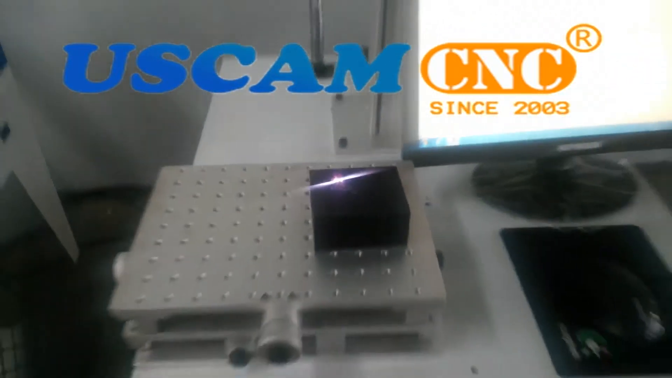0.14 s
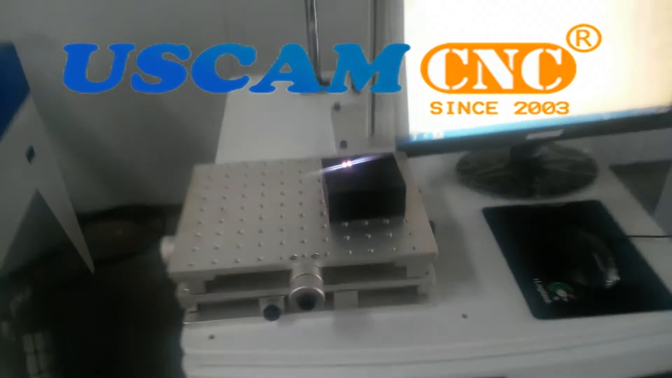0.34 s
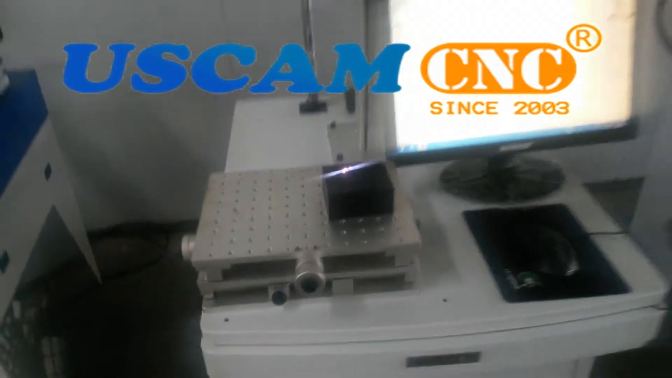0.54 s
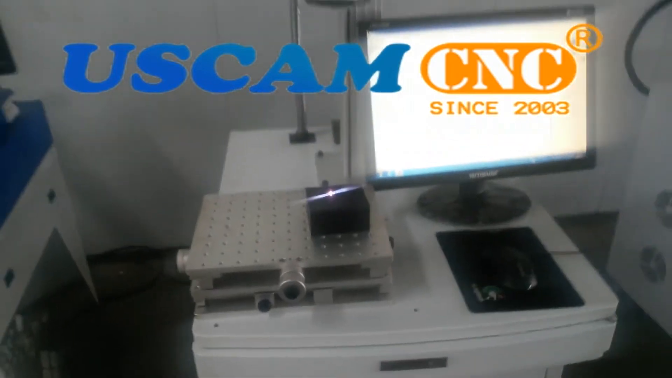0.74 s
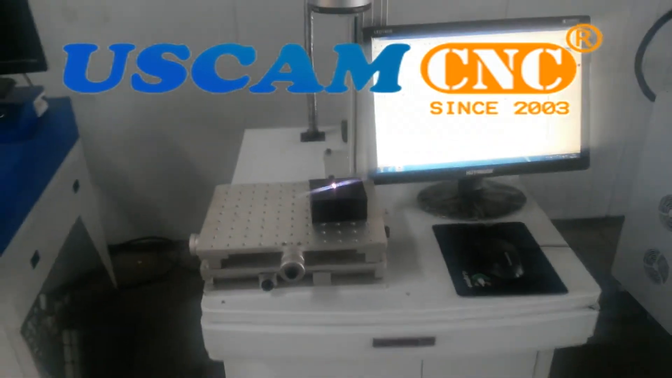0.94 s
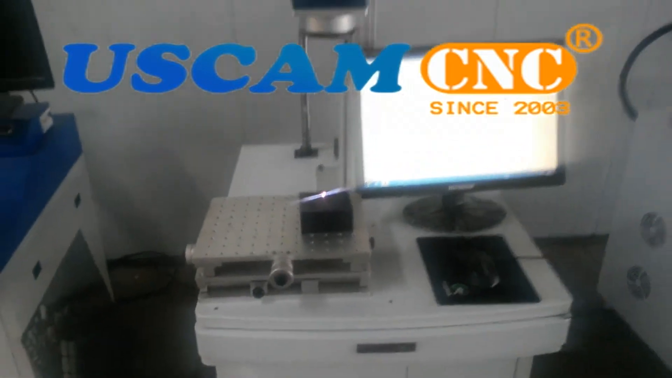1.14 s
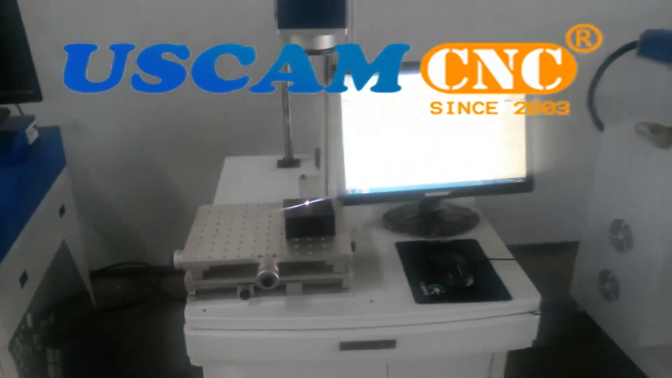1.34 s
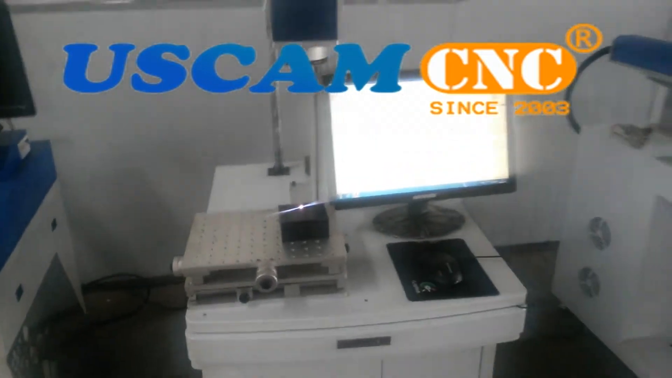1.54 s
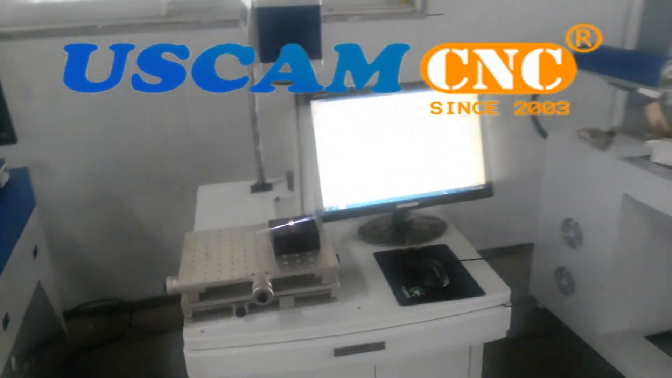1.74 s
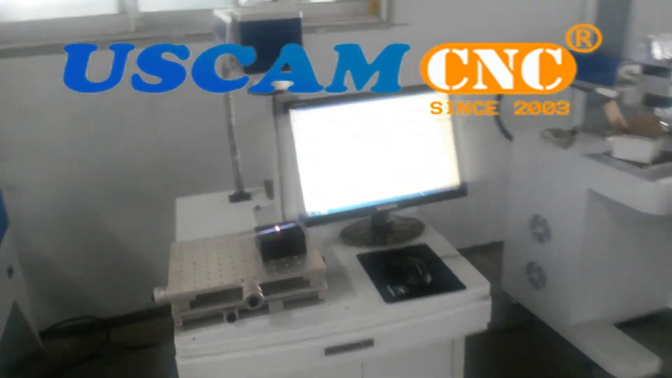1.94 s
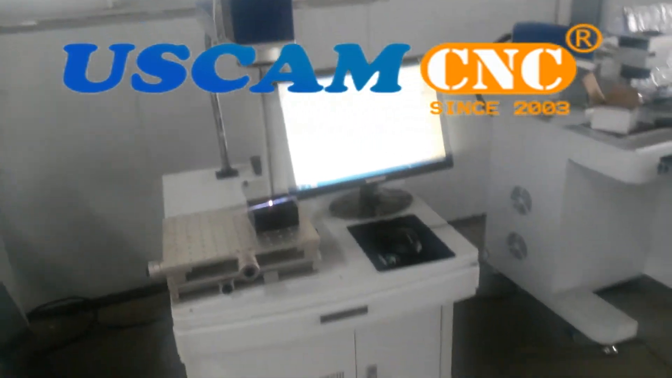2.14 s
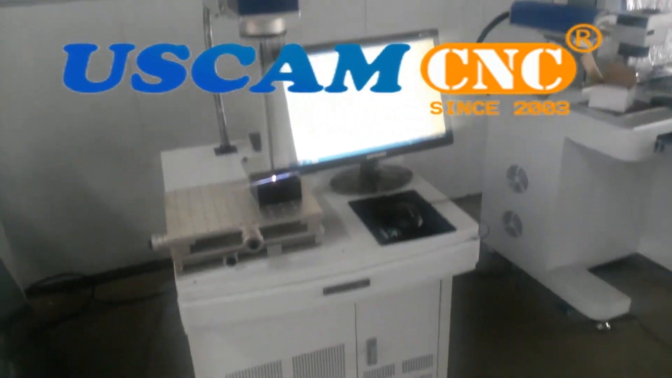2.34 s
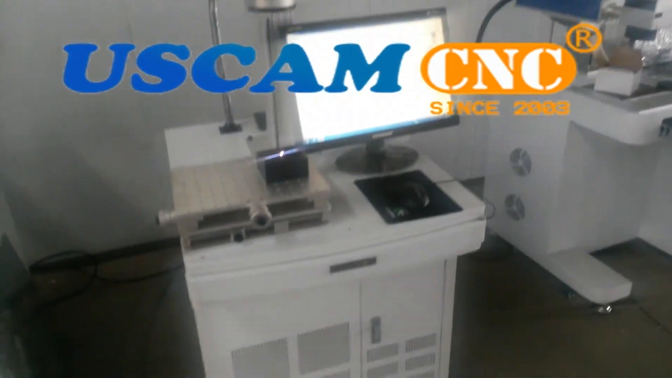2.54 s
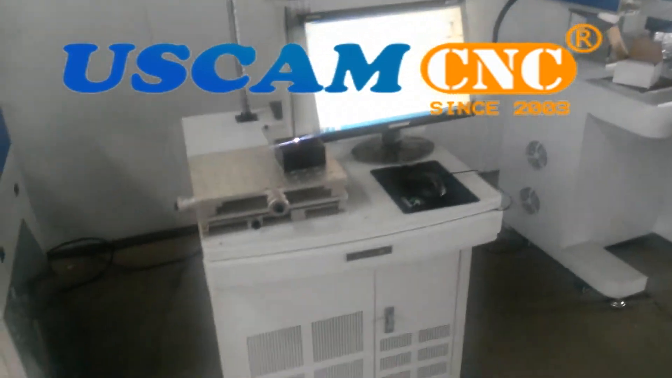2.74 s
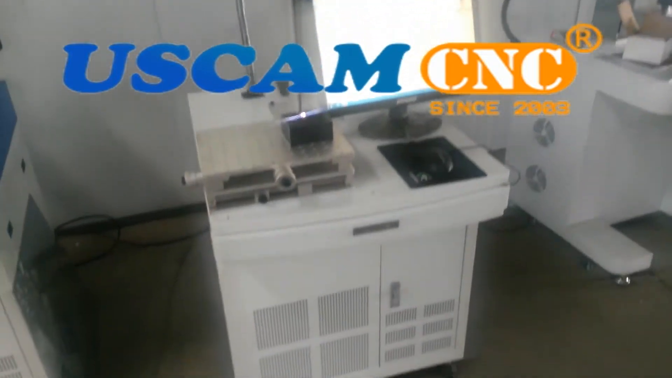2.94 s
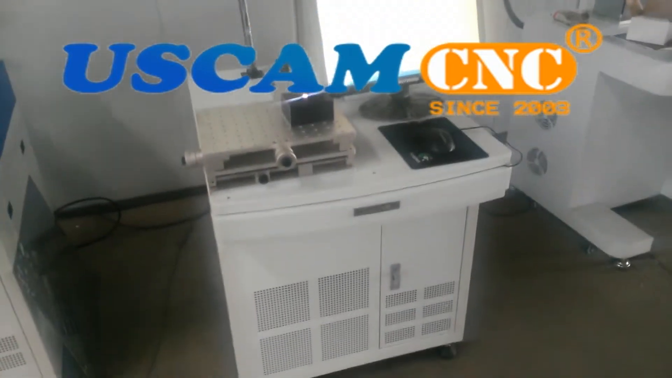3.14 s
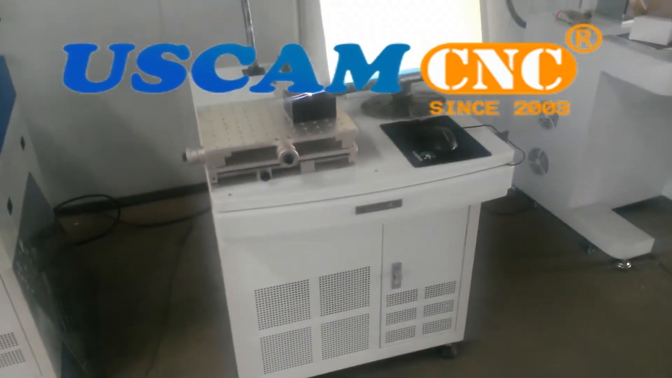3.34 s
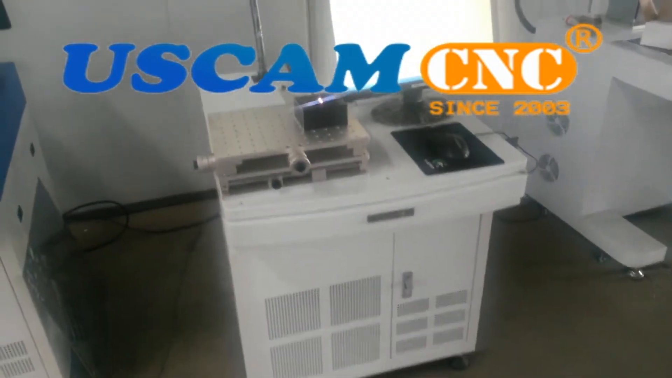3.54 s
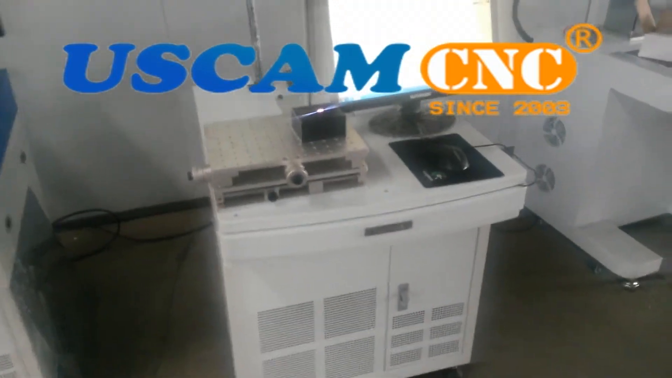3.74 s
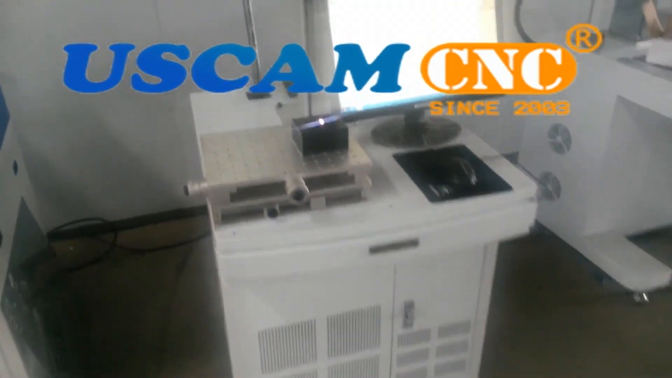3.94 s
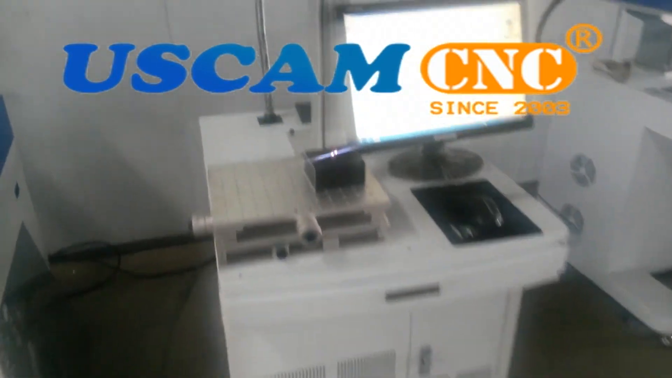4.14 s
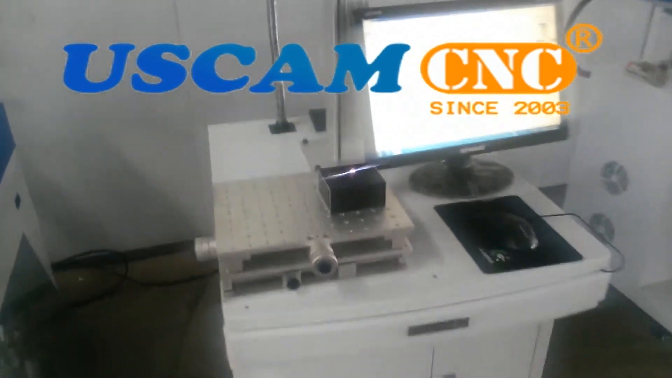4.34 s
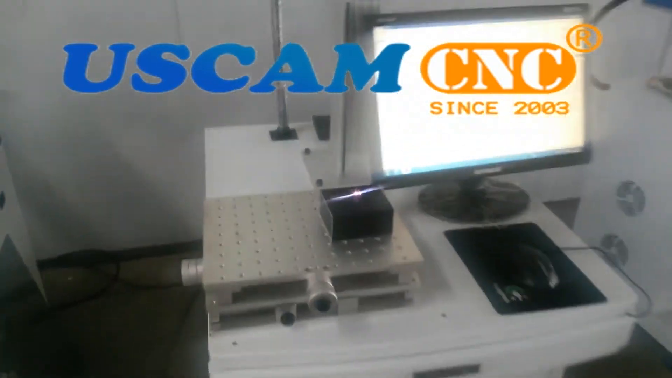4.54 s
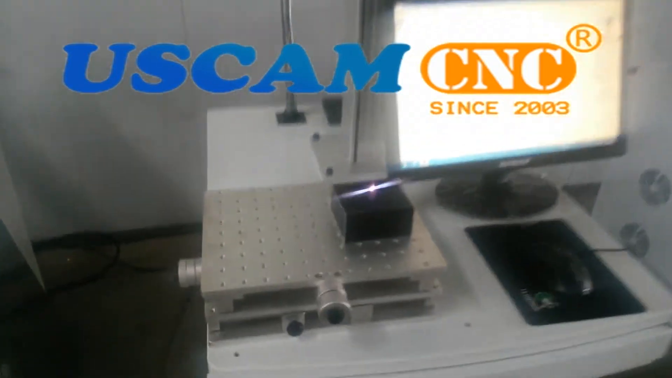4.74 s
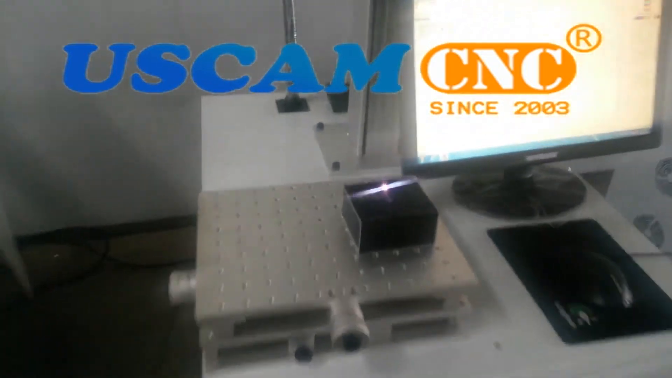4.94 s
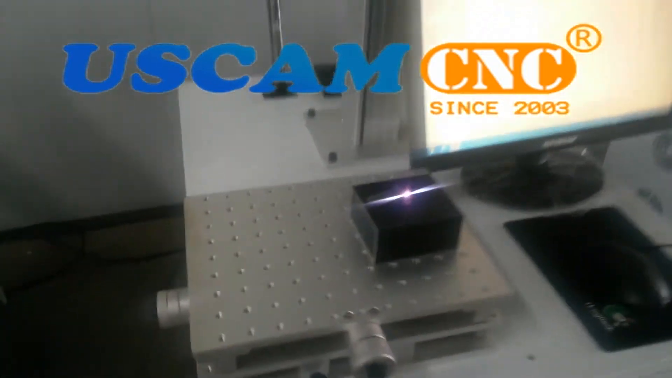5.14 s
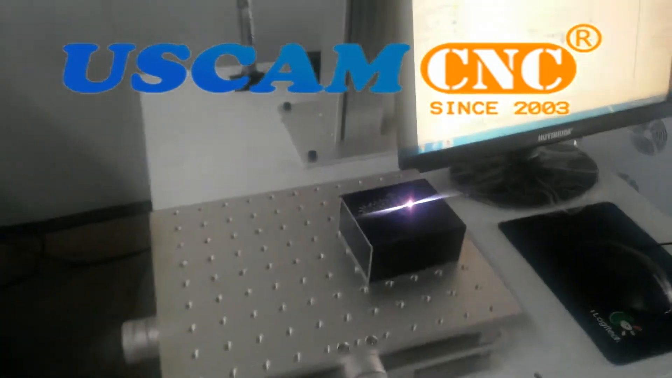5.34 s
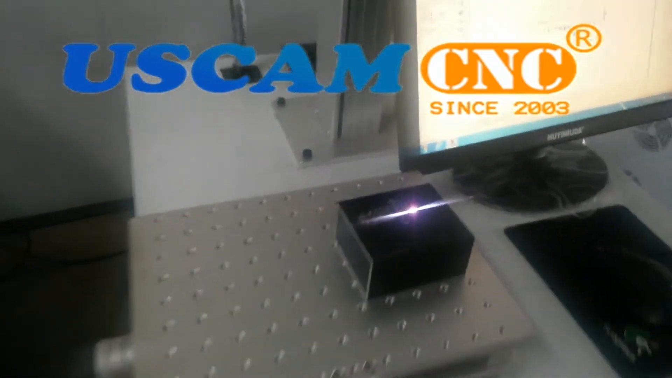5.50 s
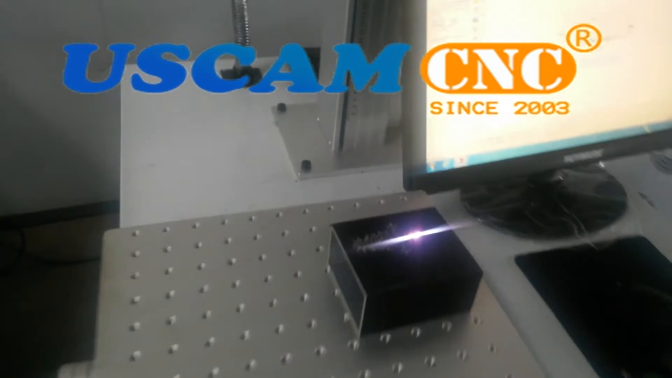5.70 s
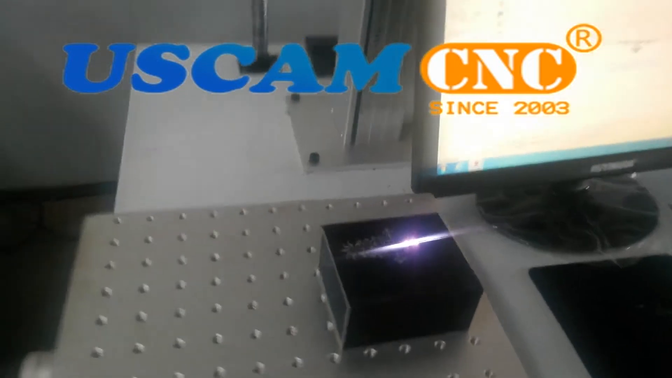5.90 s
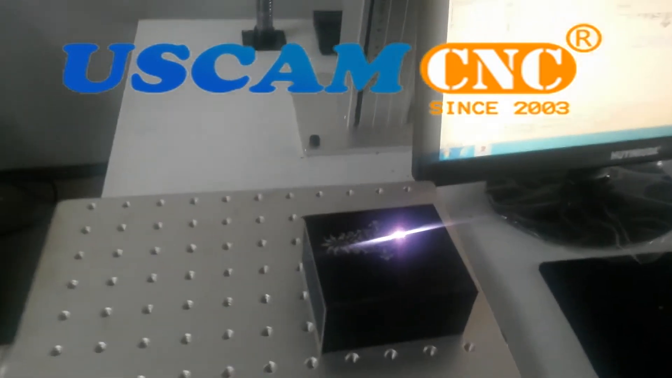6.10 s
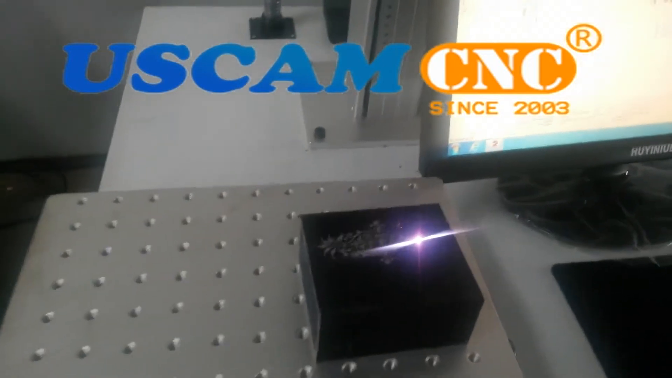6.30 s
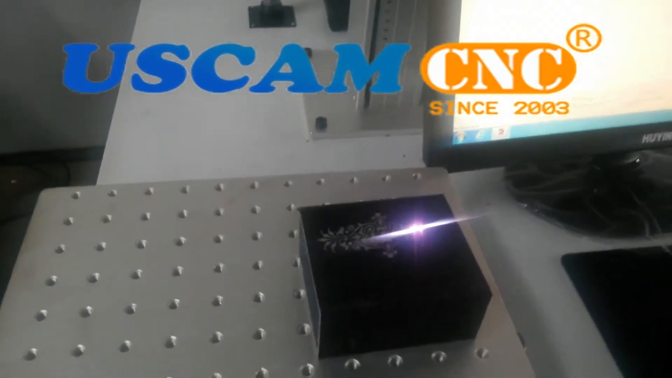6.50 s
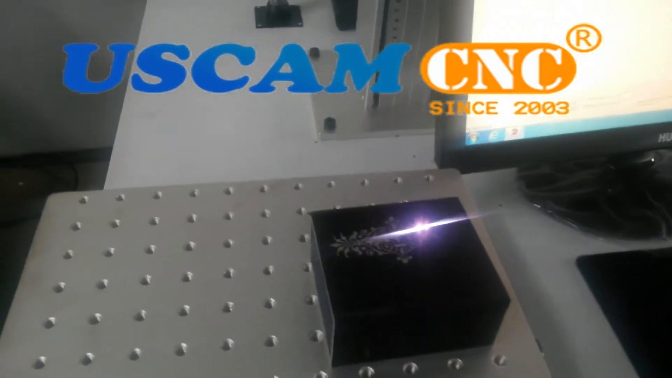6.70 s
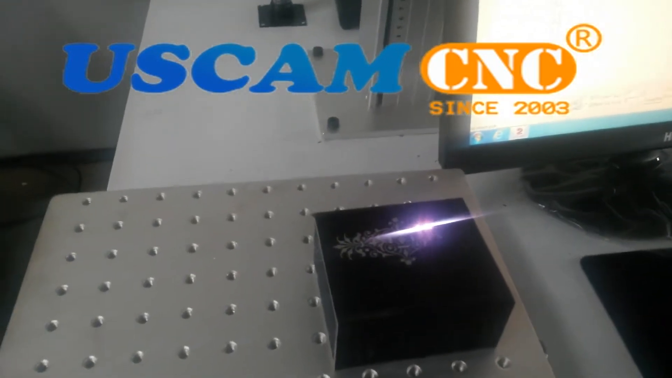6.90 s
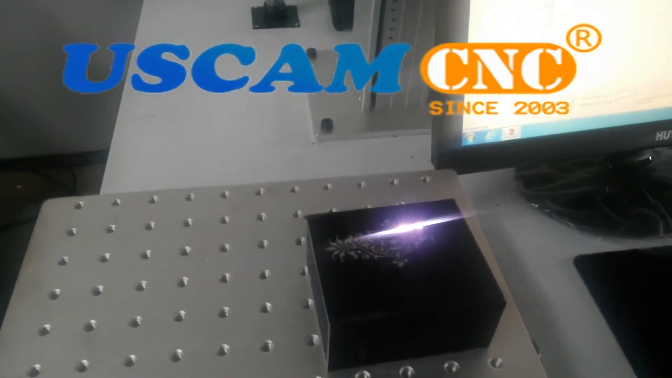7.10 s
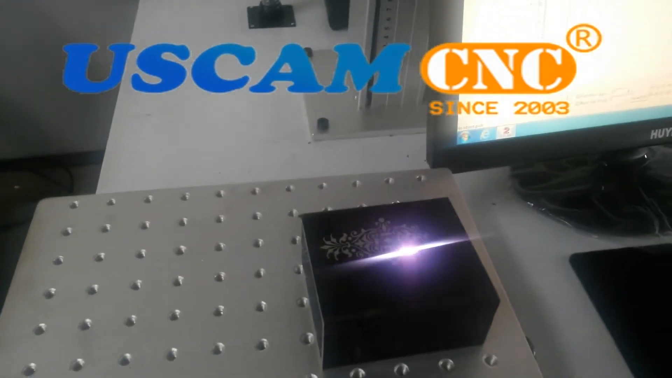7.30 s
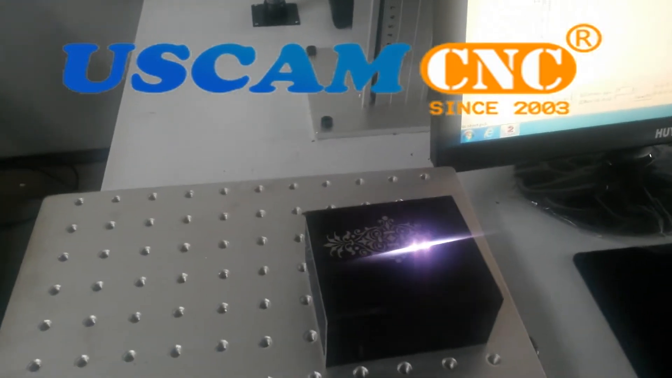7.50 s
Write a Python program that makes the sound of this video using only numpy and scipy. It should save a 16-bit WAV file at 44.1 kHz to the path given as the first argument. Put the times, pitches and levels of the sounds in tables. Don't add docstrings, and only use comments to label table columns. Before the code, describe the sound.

In a small hard-walled workshop, a laser marks a steel block with a gritty, sizzling buzz whose pitch jumps as the pattern changes. Cabinet fans rush steadily and a faint low hum follows the buzz. The handheld stereo microphone backs away, making the sound thin and washed, then moves in; a hard plastic knock lands before quick buzzing chirps and a loud, rough crackle.

```python
import sys
import numpy as np
from scipy import signal
from scipy.fft import rfft, irfft, next_fast_len
from scipy.io import wavfile
from scipy.ndimage import uniform_filter1d, map_coordinates

SR = 44100
rng = np.random.default_rng(int(sys.argv[2]) if len(sys.argv) > 2 else 0)


def volts_from_decibels(level):
    exponent = np.asarray(level, float) / 20
    return 10 ** exponent


def bounce(signal):
    frames = np.transpose(np.atleast_2d(signal))
    limited = np.clip(frames, -1, 1)
    pcm = np.round(limited * 32767).astype(np.int16)
    wavfile.write(sys.argv[1], SR, pcm)


N = 333396

# time in seconds, level in dB.
BURN_DB = [(0, -36.5), (.6, -39.5), (1.2, -38.5), (1.7, -40), (2.2, -39), (2.7, -40), (3.2, -37),
           (3.8, -35.5), (4.2, -34.5), (4.7, -33), (5, -30), (5.4, -29), (5.9, -28.5), (6.2, -29),
           (6.6, -28), (6.9, -28), (7.2, -30.5), (7.56, -29)]
# time in seconds, share from 0 to 1.
NEARNESS = [(0, 0.33), (.55, 0.13), (.7, 0.09), (3, 0.05), (3.8, 0.59), (4.2, 0.71), (4.8, 0.87),
            (5.1, 0.65), (5.9, 0.66), (6.05, 0.73), (6.35, 0.66), (6.5, 0.66), (7.56, 0.67)]
# middle in seconds, length in seconds.
JUMPS = [(4.034, 0.0015), (4.29, 0.0015), (4.72, .002), (4.736, .0025), (4.762, 0.0024), (4.865, 0.0036),
         (5.299, 0.0034), (5.978, .003), (6.089, .003), (6.1113, .004), (6.122, .003), (6.133, 0.0038),
         (6.154, 0.0035), (6.2334, 0.0072), (6.314, 0.002), (6.344, 0.0027), (6.504, 0.0016), (7.064, .003),
         (7.421, 0.0036)]
# frequency in Hz, level in dB.
NEAR_LEFT_DB = [(400, -16), (800, -24), (1300, -22), (2000, -1.4), (2400, -0.1), (2850, -5.5), (3520, 4),
                (4050, -3), (5200, -7.5), (5950, -15), (6650, -6), (7800, -18), (9000, -21.5), (10100, -12)]
NEAR_RIGHT_DB = [(400, -15), (800, -24), (1300, -31.5), (2000, -7), (2400, -10.5), (2850, -10), (3520, -3),
                 (4200, -3.5), (5200, -3), (5900, -9.5), (6650, -6), (7800, -15), (9000, -15.5),
                 (10100, -15)]
# frequency in Hz, level in dB.
FAR_LEFT_DB = [(400, -16.5), (800, -27.5), (1300, -16.5), (2000, -4), (2400, -7), (2850, -11.5),
               (3600, -10.5), (4400, -14.5), (5200, -18), (5900, -25), (6650, -20.5), (7800, -27.5),
               (9000, -31.5), (10100, -41.5)]
FAR_RIGHT_DB = [(400, -19), (800, -20.5), (1300, -20), (2000, -14), (2400, -16.5), (2850, -14.5),
                (3600, -17.5), (4400, -12), (5200, -12), (5900, -13), (6650, -15.5), (7800, -23.5),
                (9000, -29.5), (10100, -33.5)]
# frequency in Hz, lead in radians.
NEAR_LEAD_RAD = [(0, 1.5), (1550, 0), (2330, -1), (3450, -2.5), (4390, -2), (5510, -4), (5770, -3.5),
                 (6370, -1), (7150, -5.5), (7670, -4), (8350, -5), (9390, -3), (10200, -7.5), (11000, -38)]
FAR_LEAD_RAD = [(0, -3), (950, 0), (1550, -1), (2150, 2.35), (2410, -8.5), (3100, -1.5), (4130, -3.5),
                (5430, -7.5), (5860, -4), (6800, -7.5), (7580, -7.5), (8700, -12), (11000, 3.5)]
# frequency in Hz, density in dB per Hz.
FAN_AIR_DB = [(13, -48), (22, -30), (38, -15), (80, -1), (140, -7), (256, -7.5), (443, -7.5), (677, -4.5),
              (860, -7), (1210, -4.5), (1500, -4.5), (1950, -28), (3300, -120)]
# frequency in Hz, likeness from 0 to 1.
FAN_LIKENESS = [(40, 0.31), (130, 0.76), (300, 0.98), (1200, 0.56)]
# frequency in Hz, width in Hz, level in dB.
FAN_LINES = [(104, 6.1, -4), (621, 6.1, -2), (680.6, 9.8, 0.5), (1218.6, 18.5, 0), (1560, 110, -12)]
# time in seconds, level in dB, body resonance in Hz.
STRAP_KNOCKS = [
    (0.901, -42, 160),
    (4.0, -47, 70),
    (4.11, -46, 120),
    (4.16, -44, 80),
    (4.4094, -27, 340),
    (4.418, -28, 407),
    (4.43, -39, 95),
    (4.63, -46, 90),
    (6.31, -47, 80),
]
# frequency in Hz, level in dB.
WALLS_DB = [(300, -6.5), (1500, -6), (5000, -0.5), (10000, 10.5)]
# time in seconds, edges crossed per second.
EDGES_PER_S = [(0, 1100), (4.6, 1140), (4.8, 780), (4.95, 1056), (6.04, 1010), (6.09, 456), (6.17, 604),
               (6.2, 1070), (6.27, 700), (6.3, 690), (6.4, 850), (6.5, 775), (6.83, 1000), (6.85, 940),
               (6.94, 920), (7, 950), (7.44, 724), (7.56, 940)]
# delay in ms, level in dB.
FACE_ECHOES = [(1.1, -8), (3.1, -12), (5.3, -8.5), (8.2, -10.5)]
# time in seconds, centre in Hz, gain in dB.
BODY_SHADE = [(0, 9100, 0), (.5, 8100, -7), (1.1, 8600, -10), (1.7, 9400, -14), (2.6, 9900, -10),
              (3.3, 9500, 0), (4, 9000, 9), (4.7, 8400, 0), (5.2, 8300, -6), (6, 8400, -16),
              (6.5, 8400, -8), (7.56, 8240, -5)]
# time in seconds, sweep rate in Hz, outline change per sweep from 0 to 1.
FILLS = [(0, 134.6, 0.47), (1.4, 125.6, 0.4), (2.1, 69.8, 0.48), (2.45, 133.9, 0.32), (2.9, 85.03, 0.22),
         (3.2, 115.6, 0.41), (3.5, 84.8, 0.23), (3.55, 121.7, 0.18), (4, 139.2, 0.31), (4.45, 105.5, 0.29),
         (4.67, 96.5, 0.2), (4.78, 47.92, 0.56), (5.92, 62.56, 0.24), (6.35, 54.13, 0.41),
         (6.49, 69.74, 0.2), (6.7, 78.16, 0.19), (7.48, 112.4, 0.24), (7.56, 151.9, 0.1)]
# start in seconds, length in seconds, first sweep rate in Hz, last in Hz, outline change from 0 to 1.
SMALL_FIGURES = [(1.531, 0.5, 389.8, 310.7, 0.46), (2.478, 0.19, 230.8, 261.4, 0.35),
                 (3.81, 0.069, 374, 366.3, 0.22), (4.04, 0.027, 311, 300, 0.06),
                 (4.055, 0.055, 300, 223.3, 0.07), (4.11, 0.13, 223.9, 225, 0.15),
                 (4.241, 0.053, 223.9, 249.8, 0.17), (4.296, .02, 308.3, 303, 0.27),
                 (4.315, 0.097, 306.4, 242.5, 0.14), (4.937, 0.22, 96.23, 103.4, 0.19),
                 (5.173, 0.066, 263.5, 263.3, 0.1), (5.242, 0.068, 262.6, 318.8, 0.07),
                 (5.311, 0.13, 178.1, 128.1, 0.19), (5.436, 0.057, 112.3, 109.8, 0.18),
                 (5.499, 0.023, 317.3, 312.1, 0.18), (5.526, 0.075, 314, 425, 0.09),
                 (5.605, 0.023, 427.8, 430.5, 0.09), (5.627, 0.19, 98.96, 72.4, 0.27),
                 (5.967, 0.16, 75.77, 47.2, 0.4), (6.19, 0.08, 480, 468.4, 0.26),
                 (6.728, .11, 104.4, 98.85, 0.22), (6.848, .07, 391.2, 388.8, 0.055),
                 (6.918, .025, 388.9, 362.1, 0.08), (6.944, 0.073, 361, 222.3, 0.18),
                 (7.014, 0.047, 208.5, 205.9, 0.24), (7.067, 0.05, 289.9, 191, 0.16),
                 (7.115, .016, 192.2, 198.3, 0.23), (7.131, 0.0347, 198.6, 209.4, 0.2),
                 (7.165, 0.063, 213.3, 217.2, .16), (7.228, 0.095, 213.5, 149.6, 0.27),
                 (7.332, .14, 172.3, 116, 0.17), (7.48, .08, 111.6, 151.7, 0.08)]
# time in seconds, dip in dB.
SPARSE_DIPS = [(.14, 2.5), (.29, 4), (.52, 1), (.75, 3), (1.11, 1.5), (1.33, 3), (1.5, 0), (1.78, 4.5),
               (1.957, 6.5), (2.092, 2.5), (2.32, 3), (2.46, 0.5), (3.07, 0.5), (4.48, 0), (4.62, 0),
               (4.81, 3), (5.09, 0.5), (5.47, 2), (6.195, 1), (6.258, -0.5), (6.33, 1.5), (6.72, 0),
               (7.43, 1.5)]
# start in seconds, stroke count.
SWEEP_STROKES = [(0, 2), (1.53, 1), (1.96, 4), (2.3, 3), (2.4, 2), (2.48, 1), (2.68, 3), (3.525, 2),
                 (3.81, 2), (3.88, 2), (4.04, 1), (4.415, 2), (4.72, 4), (4.94, 2), (5.09, 3), (5.17, 1),
                 (5.31, 2), (5.5, 1), (5.627, 3), (5.87, 5), (5.97, 4), (6.04, 6), (6.195, 1), (6.275, 4),
                 (6.45, 3), (6.85, 1), (7.275, 2)]
# start in seconds, length in seconds, second edge as share of the sweep, its level in dB.
TWO_EDGE_BARS = [
    (4.04, .375, .385, -2),
    (5.171, .137, .564, -3),
    (5.5, .07, .33, -3),
    (5.57, .057, .415, -2),
    (6.849, .12, .518, -4),
    (7.165, .14, .125, -11),
]
# start in seconds, length in seconds, first pitch in Hz, last in Hz, dB over the snaps.
TEETH_ROWS = [
    (2.497, 0.056, 2445, 2140, -5.5),
    (3, 0.06, 2200, 2240, -13),
    (3.15, 0.19, 2135, 2140, -10),
    (3.43, 0.16, 2215, 2150, -14.5),
    (3.56, 0.081, 2135, 2345, -21),
    (3.602, 0.12, 1990, 2240, -14),
    (5.447, 0.025, 2300, 2280, -9),
    (5.385, 0.081, 2440, 2150, -18),
]
# time in seconds, dB over the snaps.
HARD_SNAPS = [(4.724, 13), (4.7617, 16), (4.8485, 16), (4.866, 13), (4.9747, 16), (5.9968, 14),
              (6.0028, 15), (6.0156, 13), (6.0266, 14), (6.0337, 13), (6.0376, 15), (6.0423, 15),
              (6.05, 14), (6.0588, 14), (6.0671, 13), (6.076, 13), (6.0827, 13), (6.0942, 15), (6.1044, 15),
              (6.107, 15), (6.1141, 16), (6.1247, 16), (6.1271, 18), (6.1305, 13), (6.136, 14),
              (6.1464, 17), (6.1491, 16), (6.157, 15), (6.1713, 13), (6.1767, 13), (6.1893, 15),
              (6.2125, 16), (6.2274, 14), (6.2398, 12), (6.2465, 14), (6.2825, 15), (6.2879, 13),
              (6.2962, 13), (6.3053, 15), (6.3127, 17), (6.3276, 14), (6.3401, 13), (6.3468, 14),
              (6.3582, 14), (6.3655, 14), (7.099, 19)]
# time in seconds, delay in ms, share.
TABLE_ECHO = [(0, 1.98, 0.17), (4.2, 2.1, 0.19), (4.6, 2.3, 0.32), (5.1, 2.19, 0.33), (6.2, 2.23, 0.57),
              (6.9, 2.25, 0.44), (7.56, 2.31, 0.57)]
# time in seconds, level in dB.
FAN_LINE_FADE_DB = [(0, 0), (4.2, -0.5), (5, -1.5), (7.56, 1)]
# time in seconds, centre in Hz, gain in dB.
LEFT_CAVITY = [(0, 3900, 3.5), (.8, 3600, 3), (1.7, 3440, 2.5), (2.7, 3368, 3), (3.4, 3693, -1),
               (4.3, 3760, 2), (5.2, 3830, 2.5), (6, 3701, 3.5), (6.8, 3690, 1), (7.56, 3653, -1)]
# time in seconds, centre in Hz, gain in dB.
RIGHT_CAVITY = [(0, 5300, 6), (.55, 5300, 7), (.75, 5400, 0.5), (2.8, 5400, 2.5), (3.3, 5400, 4.5),
                (4.1, 5400, 5), (4.5, 5319, -1), (4.9, 5300, -1), (5.2, 5202, 3), (6.2, 5395, 6),
                (6.4, 5210, -0.5), (7.56, 5101, -0.5)]
# time in seconds, advance in microseconds.
RIGHT_EARLY_US = [(0, 11), (1, 18), (2, 10), (3, 1), (3.9, 5), (4.1, 4.5), (4.85, 25), (5.1, 15), (6.2, 19),
                  (7, 12), (7.56, 11.5)]
# time in seconds, level in dB.
DRIVE_LOAD_DB = [(0, -1), (3.8, 1.5), (4.2, -1.5), (4.9, -0.5), (5.15, -1.5), (5.4, -0.5), (5.6, -1),
                 (5.75, -0.5), (5.9, 0), (6.25, -3), (6.45, -4), (6.55, -1.5), (6.75, -2.5), (6.9, -1),
                 (7.1, -3.5), (7.2, 1), (7.4, -6.5), (7.56, 0.5)]
# time in seconds, centre in Hz, gain in dB.
BODY_PATH = [(0, 2770, -2), (1, 2750, -8), (2, 2740, -7), (3, 2720, -2.5), (3.8, 2747, 1), (4.4, 2700, 1.5),
             (5, 3002, -1), (6, 2853, 1.5), (7.56, 2800, -4.5)]

ENTRY_DB = 3
BAR_EDGES = 2.3
DARK_S, DARK_DB = .0025, 9


def unit(x):
    return x / np.sqrt(np.mean(x ** 2) + 1e-20)


def along(points, hz):
    f, v = np.transpose(points)
    return np.interp(np.log(hz + 1), np.log(f + 1), v)


def curves(rows):
    s, *cols = np.transpose(rows)
    return [np.interp(np.arange(N) / SR, s, c) for c in cols]


def span(start_s, length_s):
    return slice(round(start_s * SR), round((start_s + length_s) * SR))


def wobble(rate_hz):
    knots = rng.standard_normal(int(N * rate_hz / SR) + 4)
    return map_coordinates(knots, [np.arange(N) * rate_hz / SR])


def filtered(x, response):
    m = 2 * next_fast_len(N // 2 + 4096)
    return irfft(rfft(x, m) * response(np.fft.rfftfreq(m, 1 / SR)), m)[..., :N]


def causal(gain):
    cepstrum = irfft(np.log(gain + 1e-6))
    cepstrum[1:len(gain) - 1] *= 2
    cepstrum[len(gain):] = 0
    return np.exp(1j * rfft(cepstrum).imag)


def drawing():
    rate, change = curves(FILLS)
    rate = rate * (1 + .04 * wobble(9))
    change = change * (1 + .3 * wobble(12))
    for s, length_s, first_hz, last_hz, unrest in SMALL_FIGURES:
        inside = span(s, length_s)
        rate[inside] = 1 / np.linspace(1 / first_hz, 1 / last_hz, inside.stop - inside.start)
        change[inside] = unrest
    rate = uniform_filter1d(rate * (1 + .003 * wobble(30)), SR // 200)
    pace_db = uniform_filter1d(1.17 * np.log2(rate / 100), SR // 24)
    t = np.linspace(0, N / SR, num=N // 64)
    half_width_s = 0.028
    dips_db = sum(db * np.exp(-((t - s) / half_width_s) ** 2) for s, db in SPARSE_DIPS)
    lull_db, = curves(np.transpose([t, dips_db]))
    steady_db = 8 * uniform_filter1d(np.clip(1 - 12 * change, 0, 1), SR // 100)
    return rate, np.clip(change, 0, 1), curves(BURN_DB)[0] + pace_db - lull_db + steady_db


def snaps(rate, change):
    shift, size_db, turn_s = 0.303, 4.5, 0.001318
    sweeps = np.cumsum(rate) / SR
    starts = np.flatnonzero(np.diff(np.floor(sweeps), prepend=-1))
    exact = (starts - (sweeps[starts] % 1) * SR / rate[starts])[:, None]
    period = 1 / rate[starts][:, None]
    count = np.clip(curves(EDGES_PER_S)[0][starts][:, None] * period, 1, 32)
    edge = np.arange(32)
    place = sum(((edge >> bit) & 1) / 2 ** (bit + 1) for bit in range(5))

    bar, second = np.zeros((2, len(starts), 1))
    for s, length_s, share, db in TWO_EDGE_BARS:
        inside = (starts >= s * SR) & (starts < (s + length_s) * SR)
        bar[inside], second[inside] = share * period[inside], volts_from_decibels(db + ENTRY_DB)
    count = np.where(bar > 0, BAR_EDGES, count)
    bar_edge = (bar > 0) & (edge < 2)

    path = np.cumsum(np.clip(change[starts], 0, 1))
    drift = rng.standard_normal((2, 1500, 32))
    step, part = path.astype(int) % 1499, (path % 1)[:, None]
    moved, size = (1 - part) * drift[:, step] + part * drift[:, step + 1]
    uneven = np.clip(5 * change[starts], 0, 1)[:, None]

    marking_s = period - np.clip(0.1978 * (period - .005), 0, turn_s)
    at = exact + SR * marking_s * ((place + shift * uneven * moved / count) % 1)
    at = np.where(bar_edge, exact + SR * bar * edge, at)
    jitter_s = 1.6e-5 * (0.22 + 0.6 * uneven) * np.where(bar > 0, .5, 1)
    at = at + SR * jitter_s * rng.standard_normal(at.shape)

    size = np.where(bar_edge, 0.18 * size, size)
    edge_db = size_db * np.clip(size, -2, 1.5) * (0.62 + 0.31 * uneven) + ENTRY_DB * (edge == 0)
    strength = volts_from_decibels(edge_db) * np.clip(count - edge, 0, 1)
    strength = np.where((bar > 0) & (edge == 1), second * strength, strength)
    for s, length_s in JUMPS:
        strength = strength * (np.abs(at / SR - s) > length_s / 2)
    train = impulses(at[strength > 0], strength[strength > 0])
    return train / np.sqrt(np.abs(uniform_filter1d(train ** 2, SR // 16)) + 1e-9)


def impulses(at, strength):
    taps = np.floor(at)[..., None] + np.arange(-7, 9)
    offset = taps - at[..., None]
    weights = strength[..., None] * np.sinc(offset) * np.cos(offset * np.pi / 16) ** 2
    return np.bincount(np.clip(taps, 0, N).astype(int).ravel(), weights.ravel(), N + 1)[:N]


def ports(x, left, right, lead):
    def response(hz):
        bass = hz ** 4 / (hz ** 4 + 330 ** 4)
        gains = volts_from_decibels([along(left, hz), along(right, hz)]) * bass
        lag = np.exp(-1j * np.interp(hz, *np.transpose(lead)))
        return gains * causal(gains[0]) * [np.ones(len(hz)), lag]
    return unit(filtered(x, response))


def room(level_db):
    def response(hz):
        return volts_from_decibels([along(FAR_LEFT_DB, hz), along(FAR_RIGHT_DB, hz)]) * volts_from_decibels(along(WALLS_DB, hz))
    wash = filtered(rng.standard_normal((2, N)), response)
    power = volts_from_decibels(2 * level_db)
    lag_samples = 1800
    lingering = signal.lfilter([1 / lag_samples], [1, 1 / lag_samples - 1], power, zi=[power[0]])[0]
    return np.sqrt(lingering) * unit(wash)


def faces(x, sway_ms, share):
    now = np.arange(N)

    def echo(port, ms):
        delay_ms = np.abs(ms + sway_ms * wobble(6))
        return np.interp(now - delay_ms * SR / 1000, now, port)
    return x + share * [sum(volts_from_decibels(db) * echo(port, ms) for ms, db in FACE_ECHOES) for port in x]


def table_top(x):
    ms, share = curves(TABLE_ECHO)
    top_hz = 2200
    dull = filtered(x, lambda hz: 1 / (1 + (hz / top_hz) ** 2))
    return x - share * np.interp(np.arange(N) - ms * SR / 1000, np.arange(N), dull)


def shell_ring(x):
    ring_hz, width_hz, ring_db = 3600, 420, 2

    def response(hz):
        damping = 1j * hz * width_hz
        return 1 + (volts_from_decibels(ring_db) - 1) * damping / (ring_hz ** 2 - hz ** 2 + damping)
    return filtered(x, response)


def laser(rate, change, level_db):
    near = np.clip(curves(NEARNESS)[0], 0, 1)
    steady = np.clip(1 - 6 * change, 0, 1)
    train = snaps(rate, change)
    glow = np.sqrt(np.abs(uniform_filter1d(train ** 2, 60)))
    hiss_db = -13 - 8 * steady
    spark = train + volts_from_decibels(hiss_db) * glow * rng.standard_normal(N)

    dim_db = np.zeros(N)
    for s, _ in HARD_SNAPS:
        dim_db[span(s - DARK_S, 1.25 * DARK_S)] = DARK_DB
    spark = -(spark * volts_from_decibels(-dim_db) + accents())
    close = ports(shell_ring(spark), NEAR_LEFT_DB, NEAR_RIGHT_DB, NEAR_LEAD_RAD)
    distant = ports(spark, FAR_LEFT_DB, FAR_RIGHT_DB, FAR_LEAD_RAD)
    direct = volts_from_decibels(level_db) * (volts_from_decibels(4.0) * near * close + volts_from_decibels(-1.06) * (1 - near) * distant)

    room_dim_db = uniform_filter1d(dim_db, SR // 40)
    heard = faces(direct, sway_ms=0.13, share=(1 - 0.57 * near) * volts_from_decibels(-room_dim_db))
    calm_db = 6 * steady
    heard = heard + room(level_db - 0.5 - 7 * near - calm_db - room_dim_db)

    dark = np.zeros(N)
    for s, length_s in JUMPS:
        dark[span(s - length_s / 2, length_s)] = 1
    hush = volts_from_decibels(-10 * near * uniform_filter1d(dark, SR // 800))
    return hush * [table_top(port) for port in heard]


def mirrors(rate, change, level_db):
    mount_hz = 480
    s, count = np.transpose(SWEEP_STROKES)
    strokes = count[np.searchsorted(s, np.arange(N) / SR, side="right") - 1]

    def voice(multiple):
        pitch_hz = uniform_filter1d(multiple * rate, SR // 60) * (1 + 0.02977 * wobble(40))
        phase = 2 * np.pi * np.cumsum(pitch_hz) / SR + 0.28 * wobble(5.3) * np.array([[1], [-1]])
        return np.sin(phase) / (1 + (pitch_hz / mount_hz) ** 6)
    upper = sum(volts_from_decibels(-7 + 3.0 * wobble(5.6)) * voice(strokes + k) for k in (1, 2))
    upper_share = uniform_filter1d(np.where(strokes > 1, 1, .25), SR // 50)
    tone = voice(strokes) + upper_share * upper
    blur_db = 13.5 * uniform_filter1d(change, SR // 50)
    hum_db = level_db - 14.5 + curves(DRIVE_LOAD_DB)[0] - blur_db + 1.7 * wobble(30)
    return volts_from_decibels(hum_db) * tone * volts_from_decibels([[.7], [-.7]])


def fans():
    def pair(gain):
        def response(hz):
            turn = np.arccos(np.clip(along(FAN_LIKENESS, hz), -1, 1)) / 2
            return gain(hz) * [np.cos(turn), np.sin(turn)]
        return unit(filtered(rng.standard_normal((2, N)), response))

    def lines(hz):
        return sum(volts_from_decibels(db) * np.exp(-((hz - centre_hz) / width_hz) ** 2)
                   for centre_hz, width_hz, db in FAN_LINES)
    air = volts_from_decibels(-51.5 + 1.17 * wobble(8.7)) * pair(lambda hz: volts_from_decibels(along(FAN_AIR_DB, hz)))
    air = air + volts_from_decibels(-55.5 + curves(FAN_LINE_FADE_DB)[0]) * pair(lines)
    return np.array([air[0] + air[1], air[0] - air[1]]) * volts_from_decibels([[1.1], [-1.1]])


def knocks():
    out, t = np.zeros(N + SR), np.arange(SR // 10) / SR
    shell = sum(gain * np.sin(2 * np.pi * hz * t) for hz, gain in ((1250, 1.2), (1800, 1.1), (2650, 0.58)))
    tick = shell * volts_from_decibels(-60 * t / 0.019)
    for s, db, body_hz in STRAP_KNOCKS:
        body = np.sin(2 * np.pi * body_hz * t) * volts_from_decibels(-60 * t * body_hz / 12.6)
        out[round(s * SR):][:len(t)] += volts_from_decibels(db) * (body + 0.0023 * body_hz * tick)
    return out[:N] * volts_from_decibels([[1.5], [-1.5]])


def accents():
    out, waver = np.zeros(N), 1 + 0.0085 * wobble(55)
    for s, length_s, first_hz, last_hz, db in TEETH_ROWS:
        inside = span(s, length_s)
        part = np.linspace(0, 1, num=inside.stop - inside.start)
        pitch_hz = (first_hz + (last_hz - first_hz) * part) * waver[inside]
        swell = np.sqrt(np.abs(np.sin(np.pi * part)))
        out[inside] += volts_from_decibels(db) * swell * np.sin(2 * np.pi * np.cumsum(pitch_hz) / SR)
    cold_db = 6
    for s, db in HARD_SNAPS:
        out[round(s * SR) + np.array([0, 19, 44])] += volts_from_decibels(db + cold_db) * np.array([1, .3, .2])
    return out


def scene():
    rate, change, level_db = drawing()
    clear = uniform_filter1d(np.clip(1.6 - 12 * change, 0, 1), SR // 20) * np.clip(level_db + 33, 0, 4) / 4
    ducked = volts_from_decibels(-0.011 * (level_db - level_db.mean()) - 11 * clear)
    air = np.array([table_top(port) for port in fans()])
    return laser(rate, change, level_db) + mirrors(rate, change, level_db) + ducked * air + knocks()


def shade(port, bands, early_us):
    hz, t, z = signal.stft(port, SR, nperseg=256)
    for track, width_hz in bands:
        s, centre_hz, db = np.transpose(track)
        bell = np.exp(-((hz[:, None] - np.interp(t, s, centre_hz)) / width_hz) ** 2)
        z = z * volts_from_decibels(np.interp(t, s, db) * bell)
    advance_s = np.interp(t, *np.transpose(early_us)) / 1e6
    z = z * np.exp(2j * np.pi * hz[:, None] * advance_s)
    return signal.istft(z, SR, nperseg=256)[1][:N]


def low_pass(x):
    return signal.sosfilt(signal.butter(12, 11470, fs=SR, output="sos"), x)


def record(dry):
    left = shade(dry[0], [(BODY_SHADE, 400), (LEFT_CAVITY, 330), (BODY_PATH, 220)], [(0, 0.009)])
    right = shade(dry[1], [(RIGHT_CAVITY, 450), (BODY_PATH, 220)], RIGHT_EARLY_US)
    top_hz = 10260
    mix = filtered(np.array([left, right]), lambda hz: hz < top_hz)
    return low_pass(mix)


dry = scene()
out = record(dry)
bounce(out)
```